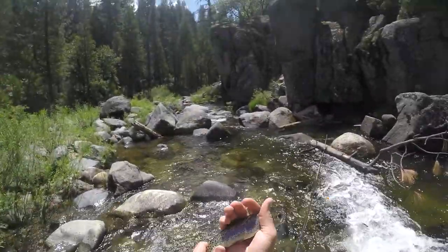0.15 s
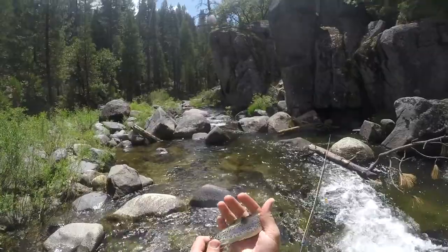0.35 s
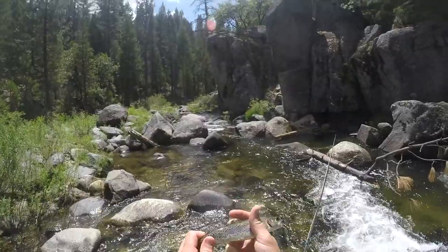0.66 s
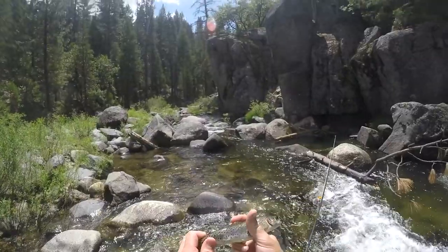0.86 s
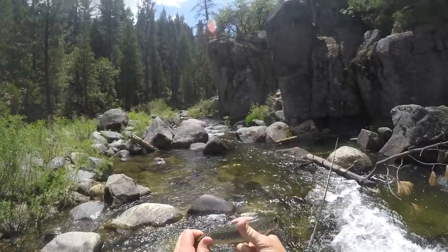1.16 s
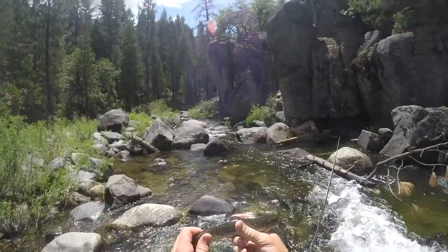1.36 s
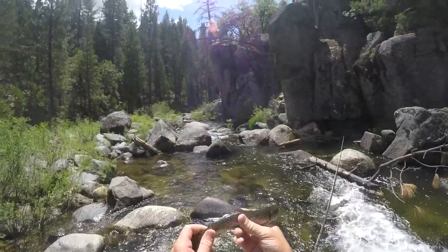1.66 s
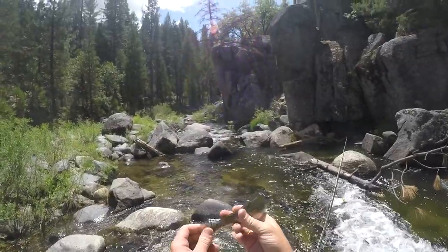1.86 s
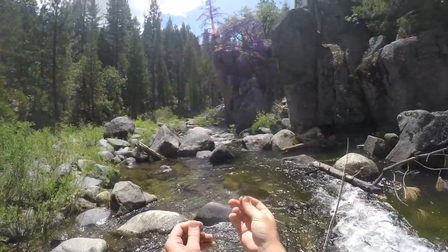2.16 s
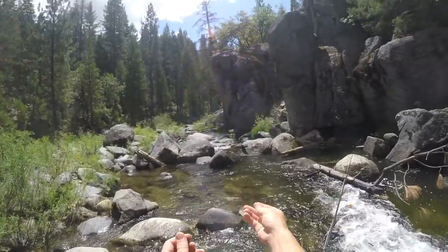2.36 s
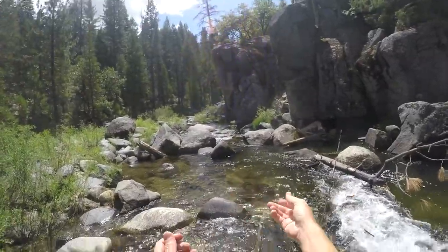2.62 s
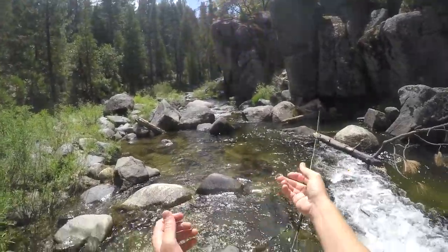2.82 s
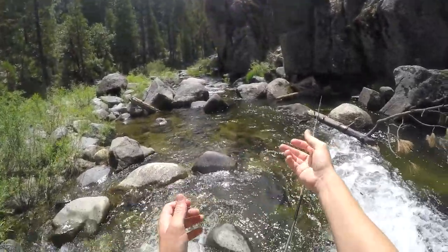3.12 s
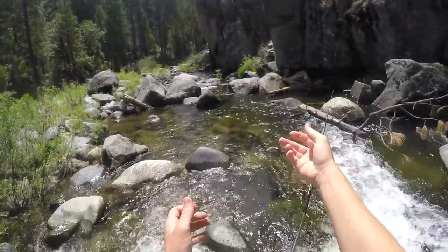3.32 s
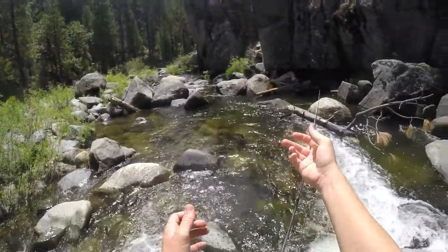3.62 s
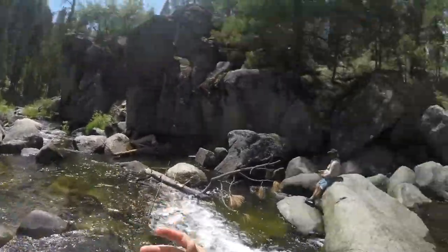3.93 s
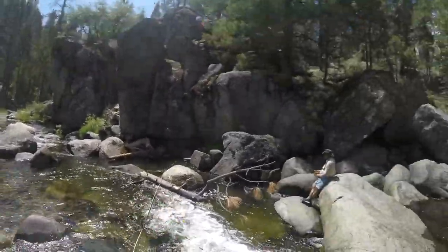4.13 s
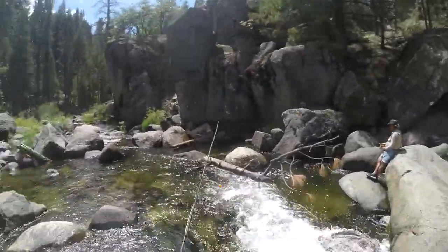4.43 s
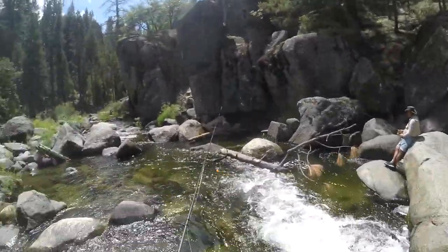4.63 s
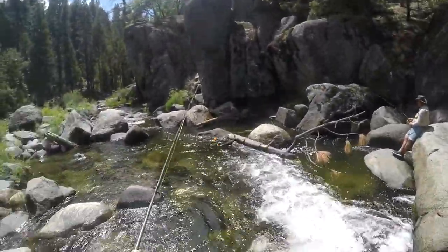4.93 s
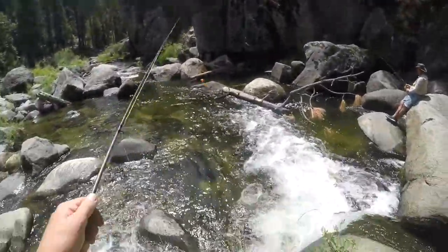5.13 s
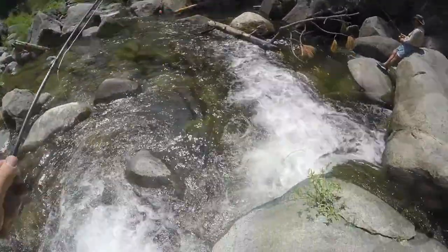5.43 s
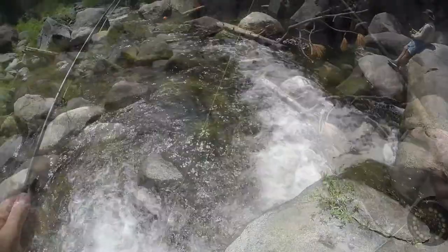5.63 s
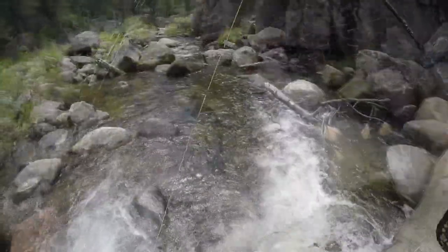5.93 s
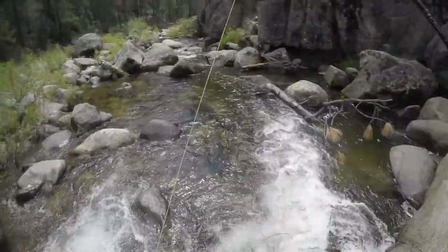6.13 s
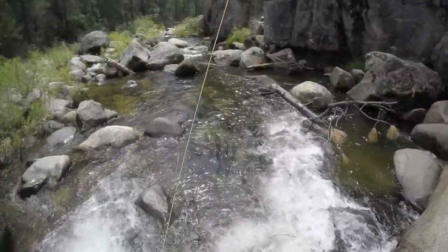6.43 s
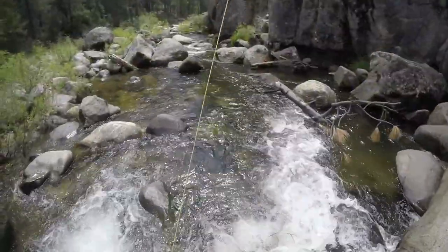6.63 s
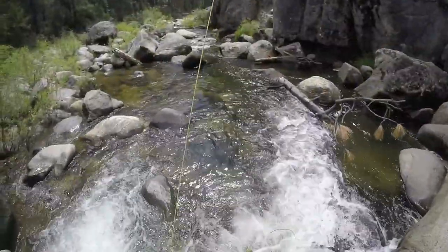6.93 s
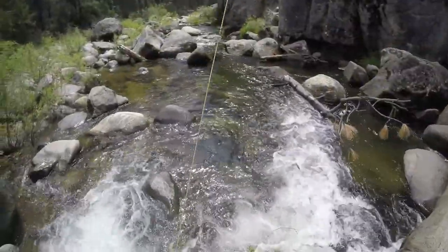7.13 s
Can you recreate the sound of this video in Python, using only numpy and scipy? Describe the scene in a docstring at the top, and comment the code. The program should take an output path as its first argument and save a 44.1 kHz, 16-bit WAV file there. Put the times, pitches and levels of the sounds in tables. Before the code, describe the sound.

A close creek rushes and bubbles over rocks with a low roar, briefly slowing and deepening, then dropping to a thin, quiet rush.

```python
"""A low roar under bright, bubbling white water: a mountain creek pours over rocks into a pool. The microphone
is close by, in a body-worn camera whose closed plastic case colours the water. The plunge pumps air under the
pool, and clouds of bubbles ring above it as they pinch off. For a few seconds everything runs in slow motion,
an octave down; back at full speed the case takes a light knock, and near the end the whole sound fades down to
a thinner, quieter rush."""
import sys
import numpy as np
from scipy import signal
from scipy.fft import rfft, irfft
from scipy.io import wavfile
from scipy.ndimage import uniform_filter1d

SR = 44100
rng = np.random.default_rng(int(sys.argv[2]) if len(sys.argv) > 2 else 0)


def store_wav(level_fs):
    """Save 16-bit WAV to argv[1]."""
    pcm = np.round(np.clip(np.atleast_2d(level_fs), -1, 1) * 32767)
    wavfile.write(sys.argv[1], SR, pcm.T.astype(np.int16))


N = 320607
TIME, BINS_HZ = np.arange(N) / SR, np.fft.rfftfreq(N, 1 / SR)
SLOW_FROM_S, SLOW_TO_S, SWITCH_S = 0.688, 3.283, 0.004  # level and band limit change over SWITCH_S
IN_SLOW_MOTION = (TIME >= SLOW_FROM_S) & (TIME < SLOW_TO_S)
# Half samples of scene time gone by: two a sample at full speed, one in slow motion.
# All that goes through replay() has its pitches, rates and decays given at full speed.
CLOCK = np.cumsum(np.where(IN_SLOW_MOTION, 1, 2))


def plunge(steady_s=0.15, heave_db=0.67, heave_hz=6):
    """Falling water pumps big pockets of air under the pool: a low roar that heaves with the flow."""
    # Spectrum of the roar: frequency_hz, density_db
    roar_colour = [(12, -20.5), (24, -9.5), (45, -5.5), (66, 2.5), (100, -3), (135, 1), (200, -1.26),
                   (235, -3.5), (265, -2.5), (340, -10), (430, -17.5), (540, -24.5)]
    # Borders of its two registers, rumble and boom: edge_hz
    edges_hz = [10, 150, 540]
    rumble_db, boom_db = -22, -23.5  # ahead of flow_gains()
    noise = shaped(rng.standard_normal(N), colour_db(roar_colour))
    roar = np.zeros(N)
    for band, db in zip(registers(noise, edges_hz), (rumble_db, boom_db)):
        power = uniform_filter1d(band ** 2, int(steady_s * SR) + 1)
        steady = band / np.sqrt(power + 1e-6)  # evened out, so the flow alone sets the slow heave
        roar += amp(db) * unit(steady * amp(heave_db * drift(heave_hz)))
    roar_gain, _ = flow_gains()
    return roar_gain * replay(roar)


def white_water(bubbles_db=-6.5, slosh_db=0.58, swell_db=0.16, splash_db=0.01):
    """Near bubbles over the smooth wash of countless far ones, heard through the case."""
    # Spectrum of the foam: frequency_hz, density_db
    foam_colour = [(500, 0.5), (800, -1), (1800, -6), (3400, -15), (6000, -24), (10000, -30),
                   (14000, -35.5)]
    # Resonances and dips of the case around the microphone: centre_hz, width_hz, gain_db
    case_resonances = [(626, 39, 4), (1060, 400, 7), (1196, 270, -6), (1425, 150, 2.5), (1842, 540, 6.5),
                       (2276, 580, 7.5), (2794, 690, 5.5), (3480, 400, -7), (3930, 580, 0),
                       (4580, 250, 2.5), (5365, 800, 6), (6820, 860, 4), (7740, 440, -2.5), (8580, 1600, 5),
                       (11500, 1500, 2.5), (13200, 780, 5)]
    # Borders of the four bubble sizes, gurgle, rush, spray and fizz: edge_hz
    edges_hz = [540, 1200, 3400, 5900, 17000]
    # The two smallest sizes over time, ahead of flow_gains(): time_s, spray_db, fizz_db
    treble_levels = [(0, -49, -56), (3.2, -49.3, -55.6), (3.33, -49, -54), (3.65, -50.5, -55.5),
                     (4.35, -53, -54), (4.85, -50, -54.6), (5.3, -48, -50.5), (5.7, -48, -51.5),
                     (6.1, -50.5, -52)]
    gurgle_db, rush_db = -40, -37  # the two biggest, on the same scale
    water = amp(bubbles_db) * bubble_cloud() + rng.standard_normal(N)
    water *= amp(slosh_db * drift(top_hz=45) + swell_db * drift(top_hz=7.3))  # all sizes move together
    water = shaped(water, colour_db(foam_colour) + humps_db(case_resonances))
    bands = [unit(band * amp(splash_db * drift(top_hz=35))) for band in registers(water, edges_hz)]
    time_s, spray_db, fizz_db = np.transpose(treble_levels)
    levels_db = gurgle_db, rush_db, np.interp(TIME, time_s, spray_db), np.interp(TIME, time_s, fizz_db)
    _, water_gain = flow_gains()
    return water_gain * sum(amp(db) * replay(band) for band, db in zip(bands, levels_db))


def bubble_cloud(per_s=7000, sizes=56, nearness_db=4.0, clump_db=2.8, ring_cycles=39, tilt=0.27):
    """Bubbles of many sizes ring as they pinch off, in clumps, a few much nearer than the rest."""
    cloud = np.zeros(N)
    candidates = 4000  # possible bubbles of each size
    for hz in np.geomspace(500, 15000, sizes):
        starts = rng.integers(0, N, candidates)
        born = rng.random(candidates) < per_s * N / SR / sizes / candidates
        nearness = np.minimum(rng.exponential(1, candidates), 4.5)
        clumps = np.interp(starts, np.linspace(0, N, 150), rng.standard_normal(150))
        strength = amp(nearness_db * nearness + clump_db * clumps) * born
        pulses = np.bincount(starts, strength * rng.choice([-1, 1], candidates), N)
        bubble = ring(hz, ring_cycles / hz, glide=0.06, soft_cycles=0.59)
        cloud += hz ** tilt * unit(signal.oaconvolve(pulses, bubble)[:N])
    return unit(cloud)


def flow_gains():
    """Gains of roar and white water: steps around slow motion, a fade to a thin rush, and surges."""
    # Rows for opening, slow motion, full speed again and thin rush: roar_db, white_water_db
    stretch_levels = [(-0.13, -0.5), (-5.5, -6), (-10, -11), (-22, -21)]
    # Surges that stand out from the churn: centre_s, length_s, roar_db, white_water_db
    surges = [(0.214, 0.098, 2, 0.5), (0.608, 0.072, 1.5, 2), (1.363, 0.069, 4.5, -0.5),
              (1.557, .08, 2.5, .5), (2.368, 0.095, 2, -.5), (3.32, .1, 1, 2.1), (3.667, 0.064, 4, -0.5),
              (4.29, 0.072, 2.5, 0.5), (4.7, .14, 2, .3)]
    thinning = np.interp(TIME, [5.61, 5.963], [0, 1])
    gains = []
    for layer, (opening, slow, resumed, thin) in enumerate(amp(stretch_levels).T):
        stepped = np.select([TIME < SLOW_FROM_S, IN_SLOW_MOTION], [opening, slow], resumed)
        stepped = uniform_filter1d(stepped, int(SWITCH_S * SR))
        faded = stepped + (thin - stepped) * thinning
        surge_db = sum(db[layer] * np.exp(-(2 * (TIME - centre_s) / length_s) ** 2)
                       for centre_s, length_s, *db in surges)
        gains.append(faded * amp(surge_db))
    return gains


def case_turning(water):
    """The colour of the water shifts as the case turns towards it."""
    # How the microphone is held: time_s, tipped_down_share, over_pool_share
    poses = [(3.3, 0.77, 0), (3.6, 0.77, 0.2), (4.8, 0.27, 0.023), (5.2, 1, 0), (5.65, 1, 0.31),
             (6.0, 0.7, 0.86), (7.27, 0, 1)]
    # Colour when tipped down at the white water: centre_hz, width_hz, gain_db
    tipped_down = [(730, 870, 0), (1090, 83, 2), (3940, 700, 3), (5300, 1300, -3.5), (6100, 630, 3.5),
                   (7450, 620, 4), (11400, 2800, -3.5)]
    # Colour when held low over the pool: centre_hz, width_hz, gain_db
    over_pool = [(1050, 110, 3.5), (1300, 550, -3.5), (1940, 280, 3), (2240, 220, -1), (3900, 600, -1.5),
                 (12500, 4000, -4)]
    time_s, *shares = np.transpose(poses)
    heard = water.copy()
    for share, colour in zip(shares, (tipped_down, over_pool)):
        coloured = shaped(water, humps_db(colour))
        heard += np.interp(TIME, time_s, share) * (coloured - water)
    return heard


def plops():
    """Single bubbles close to the microphone, each rising a little in pitch as it nears the surface."""
    # Near bubbles: start_s, pitch_hz, peak_db, t60_s
    near_bubbles = [(1.156, 2150, -33.5, 0.012), (1.222, 620, -34, 0.04), (1.244, 2210, -30, 0.016),
                    (1.268, 1100, -34, 0.035), (1.356, 4651, -43, 0.017), (1.677, 1990, -30.5, 0.022),
                    (3.66, 1760, -35, 0.016), (3.707, 1960, -38, .016), (4.598, 850, -37, .025),
                    (6.279, 1990, -44, 0.032), (6.553, 1880, -43.5, 0.026), (7.031, 2067, -50, .025)]
    track = np.zeros(N)
    for start_s, hz, db, t60_s in near_bubbles:
        add(track, start_s, amp(db) * ring(hz, t60_s, glide=0.061, soft_cycles=0.49))
    return replay(track)


def handling(dull_hz=5200):
    """Dry ticks and dull knocks right at the microphone as the case shifts on its strap."""
    # Ticks on the outside of the case: start_s, level_db, t60_s
    case_ticks = [(3.345, -37.5, .045), (3.354, -29, 0.012)]
    # Soft knocks on the case: start_s, pitch_hz, peak_db, t60_s
    case_knocks = [(3.4763, 377, -20, 0.025), (3.483, 1030, -34, 0.02), (3.493, 185, -21, 0.027)]
    ticks, knocks = np.zeros(N), np.zeros(N)
    t = np.arange(SR // 20) / SR
    for start_s, db, t60_s in case_ticks:
        add(ticks, start_s, amp(db) * rng.standard_normal(len(t)) * np.exp(-np.log(1000) * t / t60_s))
    for start_s, hz, db, t60_s in case_knocks:
        add(knocks, start_s, amp(db) * ring(hz, t60_s, glide=0, soft_cycles=0.91))
    wall_db = -20 * np.log10(1 + (BINS_HZ / dull_hz) ** 2)  # the plastic wall swallows the treble
    return replay(shaped(ticks, wall_db) + knocks)


def ring(hz, t60_s, glide, soft_cycles):
    """A dying sine with a soft start, whose pitch rises by the share glide."""
    t = np.arange(int(t60_s * SR) + 2) / SR
    envelope = (1 - np.exp(-t * hz / soft_cycles)) * np.exp(-np.log(1000) * t / t60_s)
    phase = 2 * np.pi * hz * t * (1 + glide * t / (2 * t60_s))
    return envelope / envelope.max() * np.sin(phase)


def replay(x):
    """Plays scene time on the clock: slow motion stretches it and drops it an octave."""
    return signal.resample(x, 2 * N)[CLOCK]


def add(track, start_s, sound):
    """Places a sound in scene time so that it is heard at start_s after replay()."""
    start = CLOCK[int(np.clip(start_s * SR, 0, N - 1))] // 2
    span = track[start:start + len(sound)]
    span += sound[:len(span)]


def registers(x, edges_hz):
    """Splits a sound into neighbouring bands of rms 1."""
    lowpasses = [0.5 - 0.5 * np.tanh(30 * np.log((BINS_HZ + 1) / hz)) for hz in edges_hz]
    spectrum = rfft(x)
    return [unit(irfft(spectrum * bandpass, N)) for bandpass in np.diff(lowpasses, axis=0)]


def drift(top_hz):
    """Slow random motion of rms 1."""
    return unit(irfft(rfft(rng.standard_normal(N)) / (1 + (BINS_HZ / top_hz) ** 2), N))


def colour_db(points):
    """Joins (frequency_hz, level_db) points on a log-frequency axis."""
    hz, db = np.transpose(points)
    return np.interp(np.log(BINS_HZ + 1), np.log(hz), db)


def humps_db(resonances):
    """Resonances and dips as a gain in dB for every bin."""
    return sum(db / (1 + (2 * (BINS_HZ - hz) / width_hz) ** 2) ** 2 for hz, width_hz, db in resonances)


def shaped(x, db):
    """Filters by a gain in dB for every bin."""
    return irfft(rfft(x) * amp(db), N)


def amp(db):
    """Decibels to gain."""
    return 10 ** (np.asarray(db) / 20)


def unit(x):
    """Scales to rms 1."""
    return x / np.sqrt(np.mean(x ** 2) + 1e-20)


def scene():
    """The creek and the small noises of the case, at one microphone beside the pool."""
    return (plunge() + case_turning(white_water()) + plops() + handling())[None]


def record(dry):
    """A steep band limit, an octave lower in slow motion."""
    cutoff_hz = 14950
    lowpasses = [signal.firwin(401, hz, window=("kaiser", 9), fs=SR) for hz in (cutoff_hz, cutoff_hz / 2)]
    full, slow = (signal.oaconvolve(dry, taps[None], "same") for taps in lowpasses)
    slow_share = uniform_filter1d(IN_SLOW_MOTION.astype(float), int(SWITCH_S * SR))
    return full + slow_share * (slow - full)


dry = scene()
out = record(dry)
store_wav(out)
```